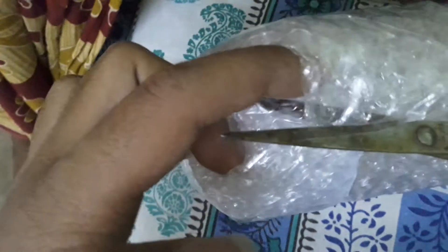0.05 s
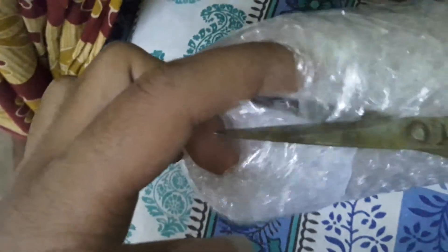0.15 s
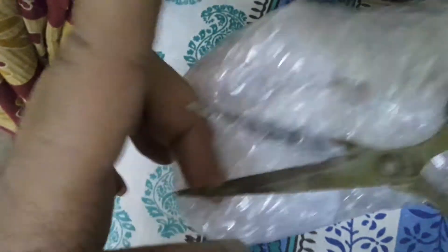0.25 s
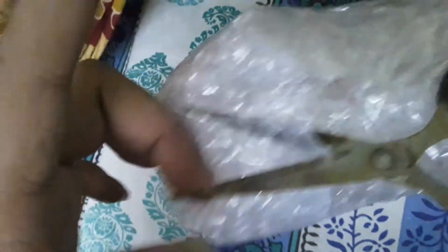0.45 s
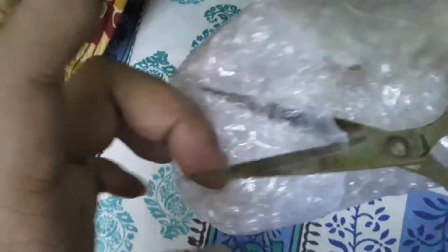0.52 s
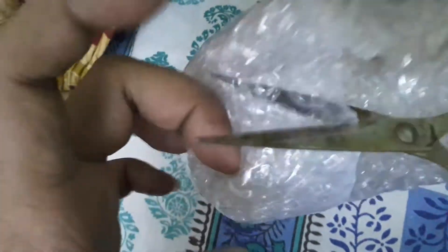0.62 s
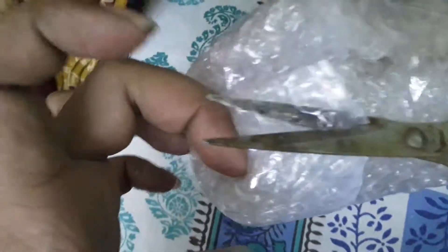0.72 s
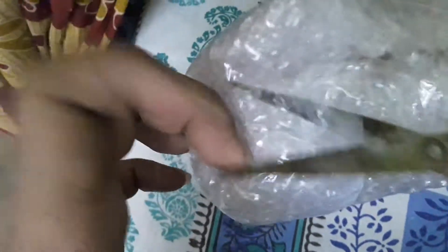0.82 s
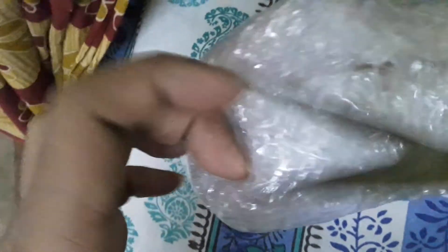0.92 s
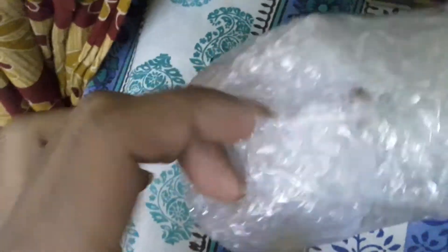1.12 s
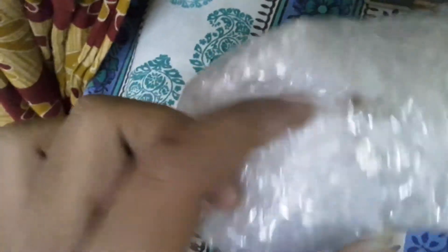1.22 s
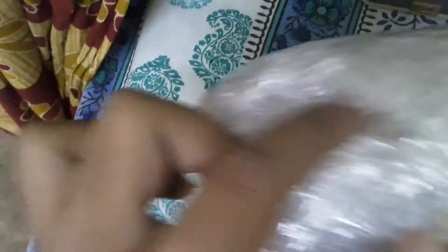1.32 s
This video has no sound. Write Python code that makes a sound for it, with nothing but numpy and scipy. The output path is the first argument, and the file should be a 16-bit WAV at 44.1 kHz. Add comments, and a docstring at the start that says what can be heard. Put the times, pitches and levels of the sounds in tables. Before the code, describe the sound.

Bubble wrap being cut with scissors, heard close up in a small room. A sharp pop comes early, followed by faint crinkling and dull hand rubbing on cloth, then another cluster of crisp plastic snaps over a low hum.

```python
"""Sharp plastic snaps and one loud pop: scissors cut bubble wrap, close by in a small quiet room.
The film buckles under blades and finger, one bubble bursts and rings the room, the blades clink faintly.
The flexed sheet crinkles between cuts; hands bump and rub the cloth-covered surface.
Room rumble, a low hum and a faint hiss lie underneath."""
import sys
import numpy as np
from scipy import signal
from scipy.fft import rfft, irfft
from scipy.io import wavfile
from scipy.ndimage import uniform_filter1d

SR = 44100
rng = np.random.default_rng(int(sys.argv[2]) if len(sys.argv) > 2 else 0)


def to_wav(sig):
    """Store sig (one row per channel, or 1-D mono) as 16-bit WAV at the path in sys.argv[1].

    Samples outside -1..1 are clipped; the rate is SR.
    """
    pcm = np.clip(np.atleast_2d(sig), -1, 1) * 32767
    pcm = np.round(pcm).astype(np.int16)
    wavfile.write(sys.argv[1], SR, pcm.T)  # frames by channels


N = 59535

# Film snaps. Each row: start in seconds, body pitch in Hz, body, crack and tick levels in dB,
# sheet rattle in dB relative to the snap, rattle T60 in seconds.
FILM_SNAPS = [(.012, 1410, -50.5, -62.5, -74, -2, 0.0092), (.0315, 1100, -71, -60, -56.5, -4, .01),
              (.1435, 1300, -54, -61.5, -71, 0, 0.011), (.161, 960, -49.5, -65, -74, -17, .01),
              (0.2281, 1110, -24, -27.5, -39.5, -2, 0.015), (0.245, 1100, -53, -65, -69, -3, 0.022),
              (.2505, 1090, -48, -64, -65, -2, .015), (.2537, 1060, -20, -27, -33.5, -9.5, 0.018),
              (0.2812, 1100, -37, -37, -47, -14, 0.018), (0.285, 1210, -36, -49, -59, -17, .012),
              (0.3082, 1120, -41, -62, -55, -4, 0.0085), (0.32, 1110, -36, -50, -45.5, -5, 0.012),
              (0.3554, 1130, -46, -52, -51.5, -7, 0.011), (0.408, 1300, -60, -60, -63, -1, 0.017),
              (0.4363, 1100, -65, -59, -56.5, -4, .02), (0.502, 1270, -54, -63.5, -52, -5, 0.018),
              (.618, 1210, -47.5, -54, -74, 1, 0.045), (.6825, 990, -43, -53.5, -52, -12, .01),
              (.711, 800, -41, -60, -63, -5, 0.065), (0.777, 1170, -47.5, -57.5, -62, 11, 0.014),
              (0.8135, 1100, -60, -76, -46, -18, .01), (.8896, 1210, -33, -47, -49, -4, 0.0081),
              (0.959, 1240, -46, -83, -76, -18, 0.019), (0.9707, 1110, -43, -76, -71, -21, .01),
              (0.991, 1150, -41.5, -52, -65, -1, 0.026), (0.9962, 1117, -22, -37, -43.5, -4.5, 0.024),
              (1.0094, 1260, -29, -37.5, -43, 4, 0.019), (1.0151, 1230, -35, -40.5, -52, -1, 0.04),
              (1.0272, 1240, -39, -44, -43.5, 4, .028), (1.083, 1340, -40, -44, -54, -5, 0.014),
              (1.141, 1190, -57, -55, -62, 3, .02), (1.259, 1370, -52.5, -51, -62, 3, 0.043),
              (1.312, 1210, -71, -53, -74, 5, 0.036), (1.333, 1230, -46, -51, -73, -2, 0.04)]
# Snap spectrum at FILM_PITCH_HZ. Each row: frequency in Hz, gain in dB.
FILM_SPECTRUM = [(100, -25.5), (400, -21), (650, -3), (1050, 4), (1500, 0), (2020, -13), (2450, -14),
                 (3300, -14.5), (4100, -25), (4900, -25.5), (6000, -36.5), (7600, -32), (9200, -21),
                 (10500, -26.5), (13000, -26), (16000, -31)]
# Body, crack and tick bands. Each row: lower edge in Hz, upper edge in Hz.
SNAP_BANDS_HZ = [(500, 2000), (2400, 6000), (8000, 16000)]
# Bursting bubble. Each row: frequency in Hz, relative level in dB, T60 in seconds.
BUBBLE_MODES = [(589, -5.5, 0.059), (940, -33, .024), (1194, 2, 0.014), (1430, 9, 0.006),
                (1720, -3, 0.0047), (2270, -1.5, 0.016), (3400, -15, 0.0078), (4400, -13, 0.017)]
# Crack of the escaping air, heard only as reflections: body, crack and tick levels in dB.
AIR_CRACK_DB = (-21, -24, -33)
# Burst echoes off nearby things. Each row: delay in seconds, gain in dB.
BURST_ECHOES = [(.0034, -5), (.0054, -10), (.0105, -37), (.0160, -19), (.0228, -19)]
# Blade contacts. Each row: start in seconds, gain in dB.
BLADE_CONTACTS = [(0.5014, -55), (0.6821, -48.5), (1.027, -45)]
# Hand-damped blades. Each row: frequency in Hz, relative level in dB, T60 in seconds.
BLADE_MODES = [(5150, 2, .012), (5640, 0.5, 0.0097), (13700, 6, .009)]
# Flexing of the sheet. Each row: time in seconds, crinkle level in dB.
FLEX_ENVELOPE = [(0, -64.5), (.13, -63.5), (.21, -86), (.4, -55), (.56, -64.5), (.64, -61), (.8, -59.5),
                 (.92, -53), (1.06, -47.5), (1.18, -61), (1.26, -55.5), (1.35, -52)]
# Creases. Each row: frequency in Hz, gain in dB.
CRINKLE_SPECTRUM = [(200, 4.5), (700, -2.5), (1300, -0.5), (2000, -5), (2600, -7), (3600, -11.5),
                    (6000, -22.5), (8000, -27.5), (9500, -16), (16000, -22)]
# Hand bumps. Each row: start in seconds, relative level in dB, centre in Hz, fraction of the free T60.
HAND_BUMPS = [(.262, -35.5, 97, 0.57), (.268, -33, 190, 0.26), (.622, -43, 187, 0.53),
              (0.653, -45.5, 145, 0.89), (.682, -46, 200, 0.98), (0.724, -44.5, 135, 0.98),
              (0.762, -41, 140, 0.83), (0.884, -40, 223, 0.22), (0.923, -35, 136, 0.5),
              (1.021, -47.5, 190, 0.81)]
# Surface. Each row: frequency in Hz, relative level in dB, free T60 in seconds.
SURFACE_MODES = [(78.5, -2, .25), (139.4, 2, 0.31), (176.6, -5.5, 0.31), (204.3, 6, .22),
                 (263.5, 2.5, 0.39), (323, -11, 0.12)]
# Hand sliding on cloth. Each row: time in seconds, level in dB.
RUB_ENVELOPE = [(0, -68), (.3, -59), (.58, -53.5), (.70, -49), (.88, -50), (1.02, -55), (1.1, -64),
                (1.35, -63)]
# Cloth friction. Each row: frequency in Hz, gain in dB.
CLOTH_SPECTRUM = [(60, -26), (120, -7), (200, 0.5), (280, -2.5), (420, -11), (600, -13.5), (1200, -21.5),
                  (4000, -47)]
# Diffuse room tail. Each row: frequency in Hz, gain in dB.
TAIL_SPECTRUM = [(80, 7), (200, 15.5), (400, 23.5), (600, 4), (1200, -3), (1900, 5.5), (2600, -1.5),
                 (4500, -0.5), (7000, 3), (10000, 2), (16000, 5)]
# Room rumble. Each row: frequency in Hz, gain in dB.
RUMBLE_SPECTRUM = [(25, -26), (45, -8), (65, -6), (105, -1.5), (140, -5.5), (175, -4), (250, -8),
                   (330, -13), (460, -13), (650, -17.5), (1260, -23.5), (2300, -30.5), (3500, -36),
                   (6200, -50), (7800, -48), (9200, -38), (16000, -38)]
# Low hum. Each row: time in seconds, level in dB.
HUM_ENVELOPE = [(0, -59), (.4, -55.5), (.7, -69), (1.0, -59), (1.2, -53.5), (1.35, -53)]
# Stereo hiss. Each row: frequency in Hz, gain in dB.
HISS_SPECTRUM = [(100, -38), (400, -7), (2000, -11), (6000, -21), (9000, 0), (16000, 4)]

FILM_PITCH_HZ, SNAP_LEVEL_WINDOW_S = 1110, 0.0022
EARLY_T60_S, EARLY_DB, LATE_T60_S, LATE_DB = 0.2, -10, 0.51, -13
TIME_S = np.arange(N) / SR


def film_snaps():
    """The film buckles under blades and finger; each snap briefly rattles the sheet around it."""
    out = np.zeros(N)
    for start_s, pitch_hz, *band_db, rattle_db, rattle_t60_s in FILM_SNAPS:
        sheet = undb(rattle_db) * noise_decay(rattle_t60_s)
        sheet[0] = 1  # direct pulse
        sheet /= np.linalg.norm(sheet)
        add(out, start_s, signal.fftconvolve(snap_pulse(pitch_hz, band_db), sheet))
    return out


def snap_pulse(pitch_hz, band_db, size=1024):
    """One buckle: a sharp pulse with its own share of body, crack and tick."""
    hz = np.fft.rfftfreq(size, 1 / SR)
    body_share = np.interp(hz, SNAP_BANDS_HZ[1], (1, 0))  # pitch shift fades out across the crack band
    shape_db = curve(hz * (FILM_PITCH_HZ / pitch_hz) ** body_share, FILM_SPECTRUM)
    band_gains = []
    for (low_hz, high_hz), target_db in zip(SNAP_BANDS_HZ, band_db):
        band = undb(shape_db[(hz > low_hz) & (hz < high_hz)])
        power = 2 * np.sum(band ** 2) / size / (SNAP_LEVEL_WINDOW_S * SR)
        gain_db = target_db - 10 * np.log10(power)
        band_gains += [(low_hz, gain_db), (high_hz, gain_db)]
    cepstrum = irfft(np.log(undb(shape_db + curve(hz, band_gains))))
    cepstrum[1:size // 2] *= 2  # fold to minimum phase
    cepstrum[size // 2 + 1:] = 0
    return -irfft(np.exp(rfft(cepstrum)))


def bubble_burst(start_s=.2571, ring_db=-17, rise_cycles=0.32, low_cut_hz=447):
    """A bubble gives way and rings; its crack echoes nearby. Returns near sound and room feed."""
    near, room_feed = np.zeros(N), np.zeros(N)
    t = np.arange(SR // 10) / SR
    tone = sum(ring([mode], t) * (1 - np.exp(-t * mode[0] / rise_cycles)) for mode in BUBBLE_MODES)
    tone = low_cut(tone, low_cut_hz)  # so small a skin radiates little bass
    add(near, start_s, -tone * undb(ring_db))
    crack = snap_pulse(FILM_PITCH_HZ, AIR_CRACK_DB)
    for delay_s, db in BURST_ECHOES:
        echo = signal.fftconvolve(crack, noise_decay(t60_s=0.0064))
        add(near, start_s + delay_s, echo * undb(db))
    add(room_feed, start_s, crack)
    return near, room_feed


def blade_clinks():
    """Steel rings faintly where the blades meet."""
    out = np.zeros(N)
    clink = ring(BLADE_MODES, np.arange(SR // 10) / SR)
    for start_s, db in BLADE_CONTACTS:
        add(out, start_s, clink * undb(db))
    return out


def sheet_crinkle(creases_per_s=900, spread_db=2, t60_s=0.0059):
    """Dense tiny creases, louder while the sheet is flexed."""
    onsets = rng.random(N) < creases_per_s / SR
    creases = onsets * undb(spread_db * np.minimum(rng.exponential(size=N), 4))
    pole = np.exp(-2 * np.log(1000) / (t60_s * SR))
    power = signal.lfilter([1], [1, -pole], creases ** 2)
    crackle = rng.choice([-1, 1], N) * np.sqrt(power)
    return follow(colour(crackle, CRINKLE_SPECTRUM), FLEX_ENVELOPE)


def hand_bumps(width_octaves=0.5, rise_s=0.0083):
    """Each soft push rings the surface modes near its centre frequency; the resting hand damps them."""
    out = np.zeros(N)
    t = np.arange(SR // 2) / SR
    attack = 1 - np.exp(-t / rise_s)
    for start_s, db, centre_hz, t60_fraction in HAND_BUMPS:
        modes = []
        for hz, mode_db, t60_s in SURFACE_MODES:
            detune = 2 * np.log2(hz / centre_hz) / width_octaves
            modes.append((hz, mode_db - 10 * np.log10(1 + detune ** 4), t60_s * t60_fraction))
        add(out, start_s, 2 * undb(db) * ring(modes, t) * attack)
    return out


def cloth_rub():
    """Dull friction noise as the hand shifts over the cloth."""
    return follow(noise(CLOTH_SPECTRUM), RUB_ENVELOPE)


def room_reverb(x, rise_s=0.0033):
    """Small furnished room: a quick dense tail and a fainter long one."""
    t = np.arange(SR // 2) / SR
    attack = 1 - np.exp(-t / rise_s)
    tail = 0
    for t60_s, db in ((EARLY_T60_S, EARLY_DB), (LATE_T60_S, LATE_DB)):
        part = rng.standard_normal(len(t)) * decay(t, t60_s) * attack
        tail += undb(db) * part / np.linalg.norm(part)
    return signal.fftconvolve(x, colour(tail, TAIL_SPECTRUM))[:N]


def background(rumble_db=-50, waver_db=1, hum_hz=74, hiss_db=-71.5):
    """Room rumble and a wavering hum; only the faint hiss differs between the ears."""
    rumble = level(noise(RUMBLE_SPECTRUM), rumble_db) * undb(waver_db * drift(rate_hz=12.46))
    hum_phase = 2 * np.pi * hum_hz * TIME_S + .5 * drift(rate_hz=5)
    hum = follow(np.sin(hum_phase), HUM_ENVELOPE)
    hiss = level(noise(HISS_SPECTRUM), hiss_db)
    return rumble + hum + hiss * np.array([[1], [-1]])


def undb(db):
    """Decibels to gain."""
    return 10 ** (np.asarray(db) / 20)


def level(x, db):
    """Set the rms level."""
    return x * undb(db) / np.sqrt(np.mean(x ** 2))


def follow(x, envelope):
    """Scale to unit rms, then apply a (seconds, dB) envelope."""
    return level(x, 0) * undb(np.interp(TIME_S, *np.array(envelope).T))


def curve(hz, points):
    """Read (Hz, dB) points on a log-frequency axis."""
    point_hz, db = np.array(points, float).T
    return np.interp(np.log(hz + 1), np.log(point_hz), db)


def colour(x, spectrum):
    """Filter by a (Hz, dB) curve."""
    hz = np.fft.rfftfreq(len(x), 1 / SR)
    return irfft(rfft(x) * undb(curve(hz, spectrum)), len(x))


def low_cut(x, hz):
    """Second-order high-pass."""
    return signal.sosfilt(signal.butter(2, hz, "high", fs=SR, output="sos"), x)


def add(out, start_s, x):
    """Mix a sound in at a time."""
    i = max(int(round(start_s * SR)), 0)
    out[i:i + len(x)] += x[:max(N - i, 0)]


def decay(t, t60_s):
    """Exponential fall, 60 dB per T60."""
    return np.exp(-np.log(1000) * t / t60_s)


def ring(modes, t):
    """Decaying modes after one push."""
    return sum(undb(db) * np.sin(2 * np.pi * hz * t) * decay(t, t60_s) for hz, db, t60_s in modes)


def noise(spectrum):
    """Steady coloured noise."""
    return colour(rng.standard_normal(N), spectrum)


def noise_decay(t60_s):
    """Short decaying noise of unit energy."""
    t = np.arange(SR // 25) / SR
    x = rng.standard_normal(len(t)) * decay(t, t60_s)
    return x / np.linalg.norm(x)


def drift(rate_hz):
    """Slow random drift of unit spread."""
    hold = int(SR / rate_hz)
    steps = np.repeat(rng.standard_normal(N // hold + 1), hold)
    smooth = uniform_filter1d(steps, hold)[:N]
    return smooth / smooth.std()


def scene(cut_send_db=-7, burst_send_db=1.5):
    """Close sources over the background; snaps, clinks and burst also ring the room."""
    cuts = film_snaps() + blade_clinks()
    burst, burst_feed = bubble_burst()
    reverb = room_reverb(cuts * undb(cut_send_db) + burst_feed * undb(burst_send_db))
    return cuts + burst + reverb + sheet_crinkle() + hand_bumps() + background() + cloth_rub()


def record(dry):
    """The phone thins the deepest bass and cuts the top."""
    bottom_hz, top_hz = 21, 15900
    high_cut = signal.ellip(8, .2, 70, top_hz, fs=SR, output="sos")
    return signal.sosfilt(high_cut, low_cut(dry, bottom_hz))


dry = scene()
out = record(dry)
to_wav(out)
```